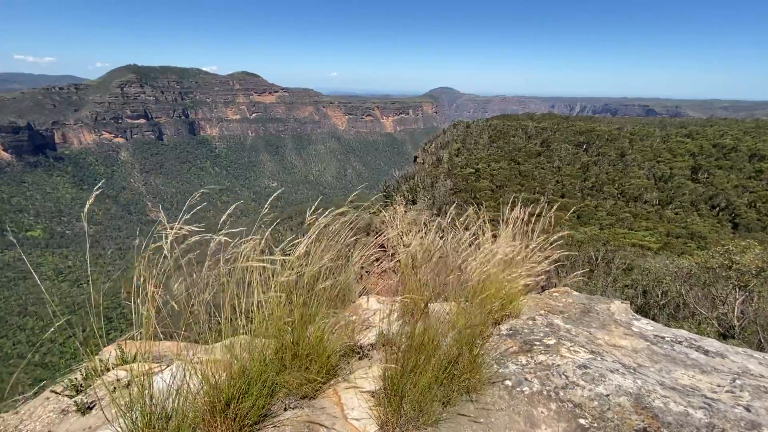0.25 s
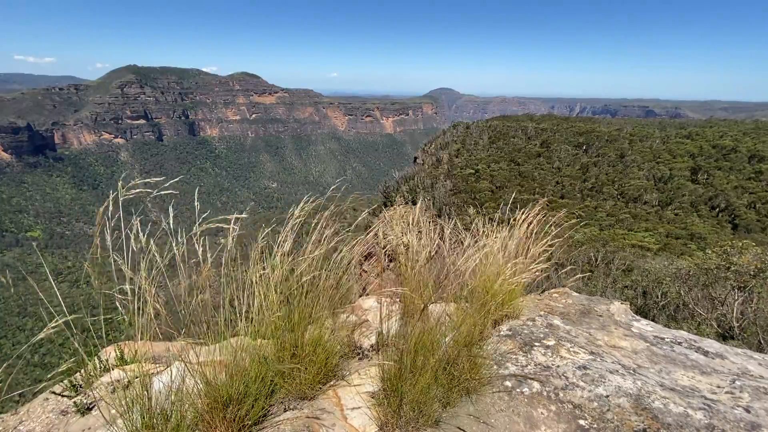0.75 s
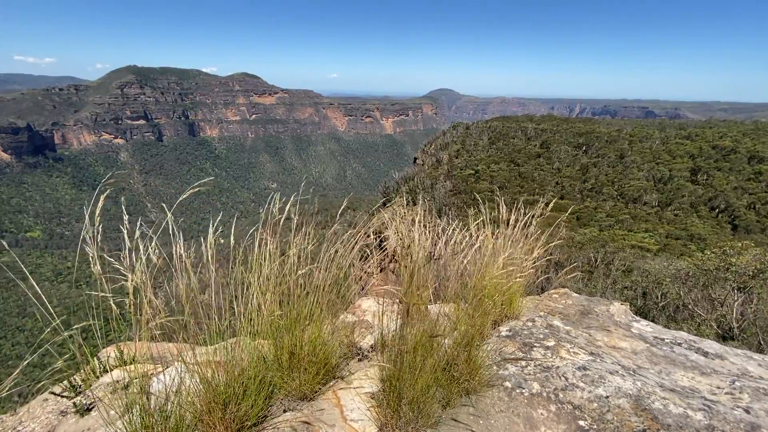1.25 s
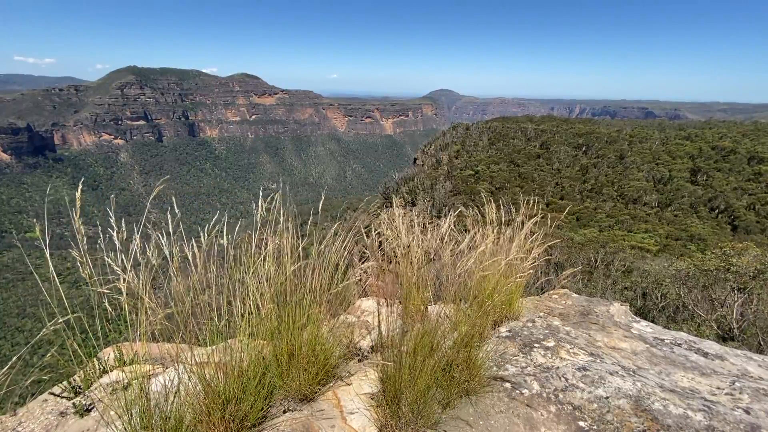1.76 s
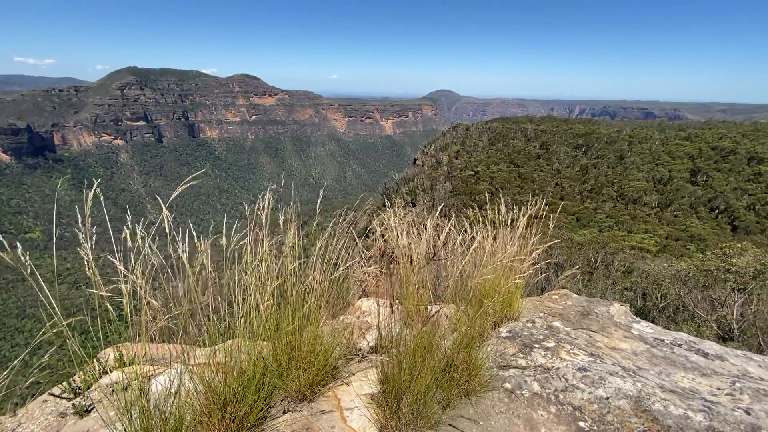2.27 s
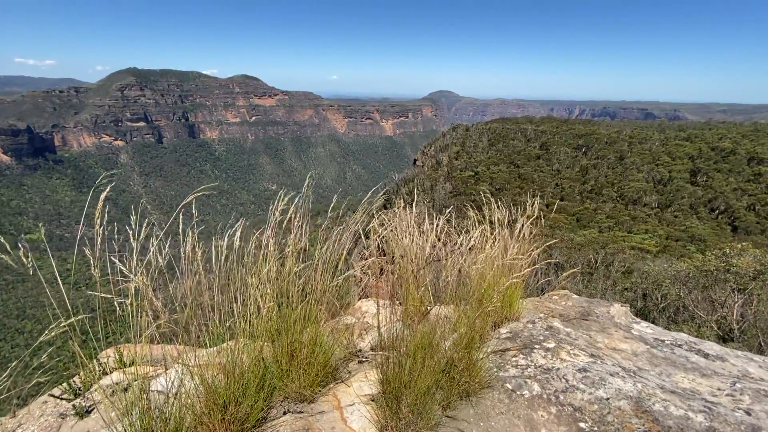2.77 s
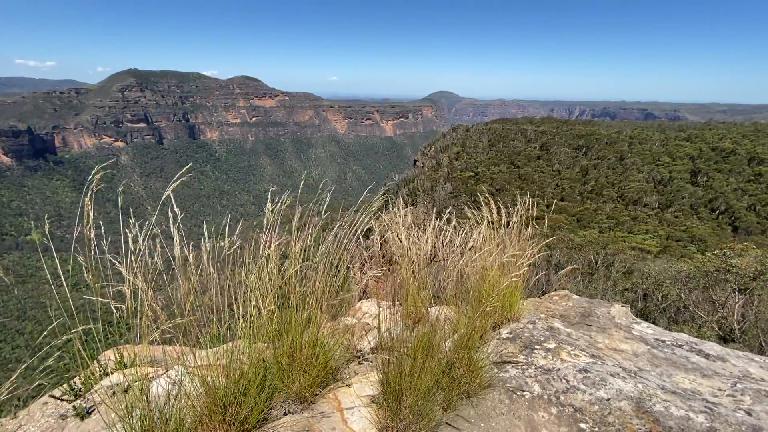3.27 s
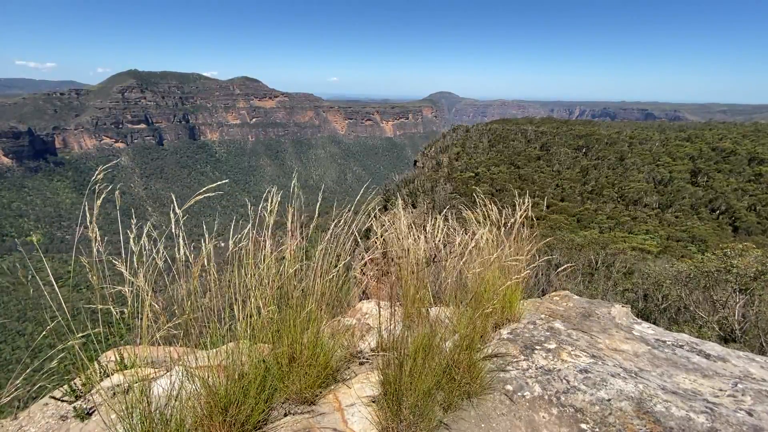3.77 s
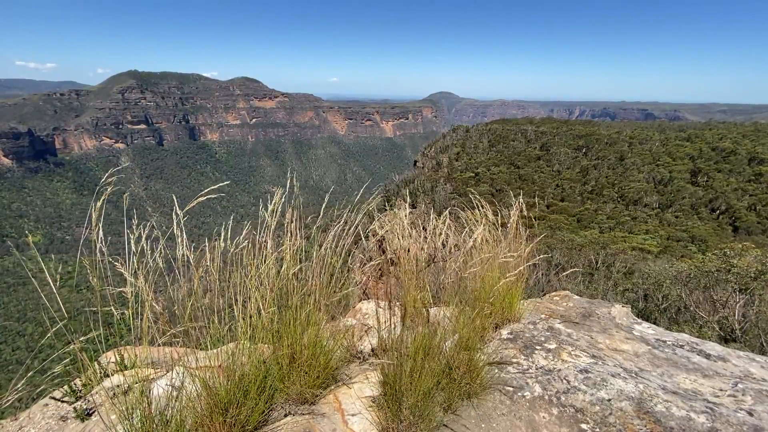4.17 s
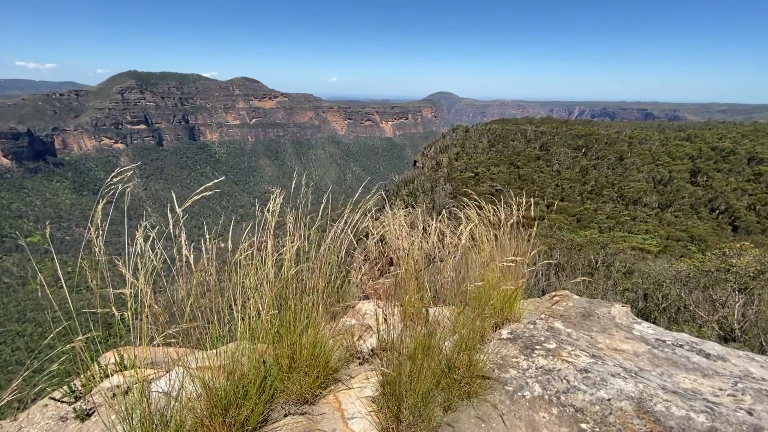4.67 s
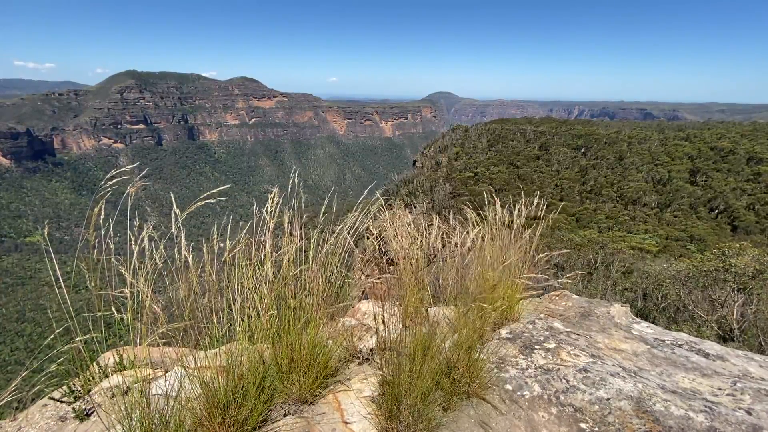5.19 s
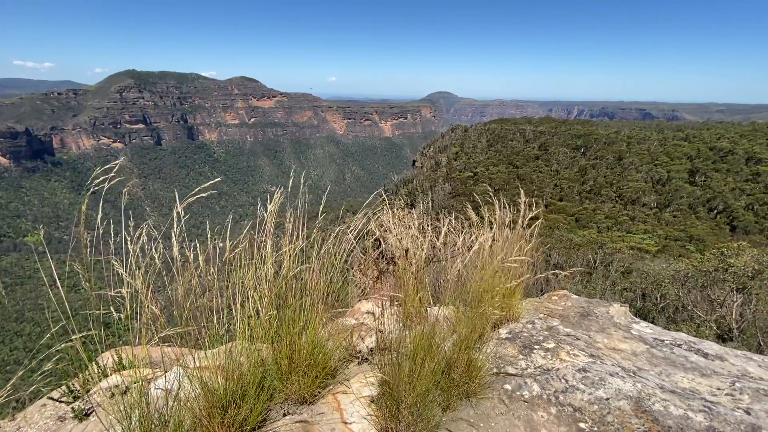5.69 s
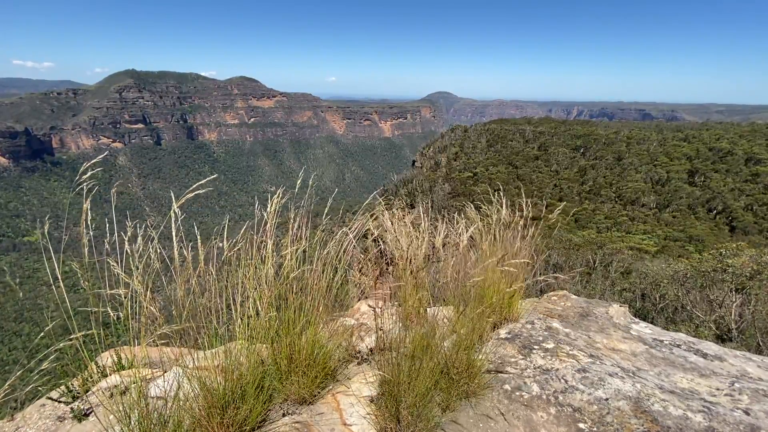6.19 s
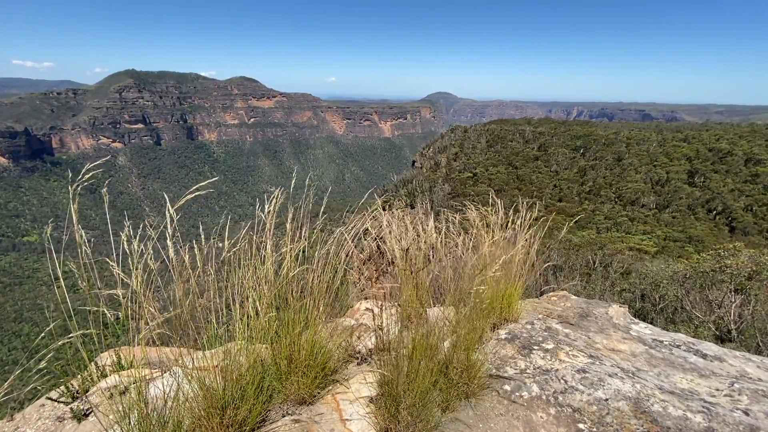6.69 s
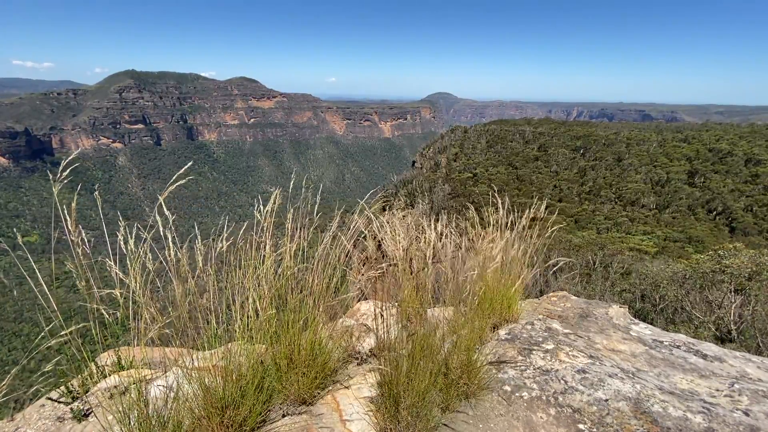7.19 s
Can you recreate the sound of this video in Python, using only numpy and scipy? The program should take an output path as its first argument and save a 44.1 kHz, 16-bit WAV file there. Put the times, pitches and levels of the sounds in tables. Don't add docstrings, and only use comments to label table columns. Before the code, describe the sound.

On an open clifftop, a large cicada close on the left buzzes short phrases about twice a second, later holding longer ones. A far chorus hisses steadily from the valley, and a tiny cicada ticks very high, five rasps a second. Wind pops and thuds on the hand-held microphone, strongest in the middle, then eases. A fly hums faintly past twice.

```python
import sys
import numpy as np
from scipy import signal
from scipy.fft import rfft, irfft, next_fast_len
from scipy.io import wavfile
from scipy.ndimage import uniform_filter1d

SR = 44100
rng = np.random.default_rng(int(sys.argv[2]) if len(sys.argv) > 2 else 0)


def invert_db(level):
    return 10 ** (np.asarray(level, dtype=float) / 20)


def bounce(signal):
    frames = np.transpose(np.atleast_2d(signal))
    limited = np.clip(frames, -1, 1)
    pcm = np.round(limited * 32767).astype(np.int16)
    wavfile.write(sys.argv[1], SR, pcm)


N = 328545
T = np.arange(N) / SR


def colour(x, points, lag_s=0.):
    hz, db = np.transpose(points)
    n = 2 * next_fast_len(N // 2 + 1)
    f = np.arange(n // 2 + 1) * SR / n + 1e-3
    gain = invert_db(np.interp(np.log(f), np.log(hz), db, -90, -90))
    delay = np.exp(-2j * np.pi * f * lag_s)
    y = irfft(rfft(x, n) * gain * delay, n)[:N]
    return y / np.std(y)


def walk(rate):
    hold = int(SR / rate)
    levels = np.repeat(rng.standard_normal(N // hold + 1), hold)
    return 1.5 * uniform_filter1d(uniform_filter1d(levels, hold), hold)[:N]


def hump(centre_s, length_s):
    return 2. ** -((2 * (T - centre_s) / length_s) ** 2)


def clicks(rate_hz, jitter_s, scatter_db, limp, start_s=0.):
    phase = np.cumsum(rate_hz) / SR
    clock = T[:len(phase)]
    turn = np.arange(0, int(phase[-1]))
    chance = rng.standard_normal((4000, 2))[:len(turn)].T
    when = np.interp(turn, phase, clock)
    early = np.interp(when, clock, limp / rate_hz) * (turn % 2)
    return start_s + when - early + jitter_s * chance[0], invert_db(scatter_db * chance[1])


def ring(when, size, modes):
    rib_s = 0.0028
    out = 0
    i = np.clip(when * SR, 0, N - 1).astype(int)
    t = T[:1500]
    for hz, width_hz, db in modes:
        drive = np.zeros(N, complex)
        np.add.at(drive, i, size * np.exp(-2j * np.pi * hz * (when - i / SR)))
        swell = np.sin(np.pi / 2 * np.minimum(t / rib_s, 1)) ** 2
        shape = swell * np.exp(-np.pi * width_hz * t)
        tone = shape / shape.max() * np.exp(2j * np.pi * hz * t)
        out = out + invert_db(db) * signal.fftconvolve(drive, tone)[:N].imag
    return out


def ports(x, lag_s):
    flat = [(1, 0), (SR, 0)]
    return np.std(x) * np.array([colour(x, flat, lag_s), x / np.std(x)])


def big_cicada():
    # [t/s, length/s, level change/dB, left minus right change/dB]
    swells = [
        (0.344, 0.17, 4, -1.5),
        (4.697, 0.3, 4, 2),
        (4.945, 0.22, -2, 3),
        (5.2, 0.184, -1.5, 3),
        (5.513, 0.062, 1.5, -2),
        (6.3, 0.084, -4.5, 3),
        (6.774, 0.3, 4.5, 2.5),
        (6.94, 0.27, -3.5, -0.5),
    ]
    # [t/s, length/s, level/dB, climb through the phrase/dB, left minus right/dB]
    phrases = [(0.0, 0.085, -41, 3, 9), (0.196, 0.34, -39.5, -0.5, 7), (0.811, 0.28, -43.5, 1.5, 8.5),
               (1.35, .27, -45, -0.5, 12.5), (1.862, 0.26, -44, 2.5, 12), (2.382, .249, -44, -4.5, 11.5),
               (2.88, .267, -44, 0, 12.5), (3.399, 0.29, -47.5, 1, 15), (3.941, .27, -44.5, 2.5, 12),
               (4.453, 1.502, -44, 2.5, 7.5), (6.09, 0.91, -46, -3, 9), (7.075, .375, -46, 1, 15.5)]
    # [f/Hz, width/Hz, level/dB]
    drum = [(4357, 141, -0.23), (3610, 57, -26.5), (5820, 230, -22)]
    # [f/Hz, width/Hz, level/dB]
    overtones = [(7170, 120, -44), (7960, 540, -45.5), (8250, 200, -45.5), (8960, 430, -36)]
    # [t/s, f/Hz]
    buckles = [(.3, 191), (1.0, 194), (4.3, 197), (4.65, 194), (5.2, 186), (6.2, 184), (7.45, 187)]
    entry_db, entry_s = -.5, .04
    warmup_s, limp = .05, .055
    sag, sag_s = .015, .08
    neighbour_db = -14.5
    when, size, pan_db, drift = [], [], np.full(N, 9.), walk(6)
    swell_db, lean_db = sum(hump(s, length) * np.array([[db], [side_db]]) for s, length, db, side_db in swells)
    for start, length, phrase_db, climb_db, side_db in phrases:
        on = (T >= start) & (T < start + length)
        pan_db[on] = side_db + lean_db[on]
        u = T[on] - start
        level_db = phrase_db + climb_db * (u / length - .5)
        level_db = level_db + entry_db * np.exp(-u / entry_s) + swell_db[on]
        cold = np.exp(-(u + (start < .01)) / warmup_s)
        tired = sag * np.exp((u - length) / sag_s)
        rate_hz = np.interp(T[on], *np.transpose(buckles)) * (1 - .17 * cold - tired + .004 * drift[on])
        # rate ratio, jitter in s, scatter in dB, level in dB
        for speed, jitter_s, scatter_db, db in [(1, .000015, 1.0, 0), (.965, .00003, 2.0, neighbour_db)]:
            at, gain = clicks(speed * rate_hz, jitter_s, scatter_db, limp + 0.329 * cold, start)
            second_drum = np.arange(len(at)) % 2
            shy_db = np.interp(at, T[on], cold) * (db + 1.5 - 4.5 * second_drum)
            when = np.r_[when, at]
            size = np.r_[size, gain * invert_db(db + shy_db + np.interp(at, T[on], level_db))]
    song = invert_db(8.0) * ring(when, size, drum)
    loose = when + 0.000338 * rng.standard_normal(len(when))
    upper = invert_db(-21) * ring(loose, size ** 0.3, overtones)
    tail = rng.standard_normal((2, 4000)) * invert_db(-60 * T[:4000] / 0.065)
    blur = signal.fftconvolve(song[None], tail, axes=1)[:, :N] * invert_db(-54.5)
    pan_db = uniform_filter1d(pan_db, size=800)
    direct = ports(song, 0.0002595) * invert_db(np.array([pan_db, -pan_db]) / 2)
    return direct + blur + ports(upper, 0.00025)


def chorus():
    # [t/s, level/dB]
    swelling = [(0.0, -44), (0.1, -54.5), (0.52, -51.5), (0.6, -53.5), (2.53, -52), (2.76, -56.5),
                (2.9, -53), (4.3, -53.5), (4.44, -56.5), (4.65, -50.5), (5.13, -57), (5.33, -48.5),
                (5.48, -52.5), (7.2, -52.5), (7.41, -51.5)]
    # [f/Hz, level per Hz/dB]
    chorus_colour = [(1710, -39), (2900, -25), (3270, -18), (3370, -14), (3760, -2.5), (4100, 0.5),
                     (4640, 2.5), (4860, -6), (6090, -23.5), (6180, -15.5), (6630, -29), (7700, -32.5),
                     (9600, -18.5), (12500, -101), (21100, -120)]
    # [f/Hz, level per Hz/dB]
    valley_colour = [(250, -18), (420, -14.5), (780, -15), (1010, -12), (1120, -14.5), (1290, -12),
                     (1410, -4), (1660, 1), (2070, -5.5), (2370, -4), (3100, -8.5), (4030, -16),
                     (6820, -120)]
    noise = rng.standard_normal((6, N))
    level_db = np.interp(T, *np.transpose(swelling)) + 3.5 + .7 * walk(12)
    high = [colour(n * invert_db(0.31 * walk(150)), chorus_colour) for n in noise[:3]]
    low = [colour(n * invert_db(1.4 * walk(8.2)), valley_colour) for n in noise[3:]]
    below = signal.butter(6, 6300, fs=SR, output="sos")
    above = signal.butter(6, 6300, "high", fs=SR, output="sos")
    unlike = signal.sosfilt(below, high[1:])
    treble = ports(signal.sosfilt(above, high[0]), 0.000256)
    far = 0.12 * ports(high[0], 0.0002558) + 0.76 * unlike + 0.28 * treble
    far = far * invert_db(level_db + 6.5)
    valley = 0.56 * ports(low[0], 0.00051) + 0.84 * np.array(low[1:])
    valley = valley * invert_db(-58.5 - 1.84 * np.exp(-T / 2.0))
    lean = invert_db(np.array([[1.5], [-1.5]]))
    return lean * (far + valley)


def small_cicada():
    # [t/s, level/dB, late against the beat/s]
    rasps = [(0, -71, 0.0044), (.7, -63.5, -0.003), (1.3, -64, -0.012), (2.1, -67, 0.0022),
             (2.6, -63.5, -0.0023), (3.5, -66, -0.0075), (3.8, -67.5, -0.015), (4.5, -62, -0.012),
             (4.9, -65.5, -0.02), (5.5, -63.5, -0.0099), (6.0, -66.5, -.021), (6.5, -67, -0.019),
             (7.1, -68.5, -0.0081), (7.4, -64, -0.0054)]
    # [f/Hz, level/dB]
    rasp_colour = [(9200, -41), (10000, -14), (11400, -7), (13200, -3.5), (15000, -1), (15500, -3),
                   (16500, -20)]
    # [f/Hz, level/dB]
    kin_colour = [(9200, -26), (10000, -6.5), (11400, -1.5), (13200, 0.5), (15000, -3), (16500, -1)]
    beat_s, first_stop_s, rasp_s, scatter_db = .1953, .148, .083, 1.2
    gate = np.zeros(N)
    s, level_db, late_s = np.transpose(rasps)
    beats = first_stop_s + beat_s * np.arange(int(T[-1] / beat_s))
    for beat, luck in zip(beats, rng.standard_normal(len(beats))):
        u = T - beat - np.interp(beat, s, late_s) + rasp_s
        db = np.interp(beat, s, level_db) + scatter_db * luck
        rise = np.clip((u + 0.014) / 0.044, 0, 1) ** 0.9
        stop = np.exp(-np.maximum(u - rasp_s, 0) / 0.0066)
        gate += invert_db(db + 3.5) * rise * stop
    when, size = clicks(525 * (1 + 0.016 * walk(20)), .0003, 1.9, .1)
    size = size * invert_db(1.5 * np.sin(2 * np.pi * 105 * when))
    ticks = np.bincount(np.clip(when * SR, 0, N - 1).astype(int), size, N)
    burst = signal.lfilter([1], [1, -np.exp(-1 / (0.0057 * SR))], ticks) * rng.standard_normal(N)
    rasp = colour(burst * gate, rasp_colour) * np.sqrt(np.mean(gate ** 2))
    kin = colour(rng.standard_normal(N) * invert_db(0.46 * walk(5)), kin_colour)
    return ports(rasp + invert_db(-71) * kin, 0.0002656)


def eddy(top_hz, turn, last_s, fall_s, end_hz, size=3000):
    t = T[:size]
    hz = end_hz + (top_hz - end_hz) * np.exp(-t / fall_s)
    shape = (t / last_s) ** 2 * np.exp(-2 * t / last_s)
    return np.sin(np.cumsum(hz) * 2 * np.pi / SR + turn) * shape / shape.max()


def turbulence(top_hz, scatter_db, count):
    out = np.zeros(N + 3000)
    for when, turn, size, pitch in rng.random((count, 4)):
        i = int(when * N)
        swirl = eddy(top_hz * (.5 + pitch), 2 * np.pi * turn, 0.0034, 0.006, 91, size=1000)
        out[i:i + 1000] += invert_db(-scatter_db * np.log(1 - size)) * swirl
    return out[:N] / np.std(out)


def wind():
    # [t/s, length/s, rumble level/dB, flutter minus rumble/dB, left minus right/dB]
    gusts = [(.27, 0.2, -55.5, 0, 6.5), (0.92, 0.028, -45.5, -34, 17), (1.276, 0.096, -70, -11, 17),
             (1.547, 0.16, -45, -32, 6), (1.807, 0.28, -46, -4.5, 2.5), (2.107, 0.1, -40, -38, 7.5),
             (2.272, 0.25, -44.5, -20, 7), (2.636, 0.16, -43.5, -39, 2), (2.878, 0.11, -43.5, -10, 3),
             (3.126, 0.28, -52.5, -2.5, -0.5), (3.405, 0.22, -38.5, -16.5, 5.5),
             (3.633, 0.083, -42, -1.5, -1), (3.768, 0.16, -35.5, -7, 4.5), (3.987, 0.12, -44.5, -32, 3.5),
             (4.319, 0.2, -34.5, -9.5, 2.5), (4.612, 0.18, -47.5, -5, 4), (4.794, 0.2, -54.5, -0.5, 2),
             (5.01, 0.11, -64, -4, 10), (5.243, 0.082, -45.5, -15, -4), (5.58, 0.13, -56, -11, 2),
             (5.905, 0.16, -49.5, -11.5, 4.5), (6.24, 0.44, -56, -1, 1), (6.671, 0.23, -42, -14, 1.5),
             (7.29, 0.21, -52, -15, 7)]
    # [t/s, peak level/dB, sharpness/dB, left minus right/dB]
    pops = [(0.266, -36, -23, -1), (0.276, -42.5, -14.5, 6), (1.749, -38, -12, 5.5),
            (1.769, -39, -11.5, 3.5), (1.792, -35.5, 1.5, 6.5), (1.817, -37.5, 1.5, 7.5),
            (1.838, -32, -15, 0.5), (1.852, -38, 1, 6.5), (2.074, -39.5, -14.5, 12), (2.196, -48, -28, 23),
            (3.289, -47.5, -24.5, 20.5), (3.64, -40.5, -16, 8), (3.658, -38.5, -17, -4),
            (3.689, -44, -2.5, 6.5), (3.733, -32, -21, -2.5), (3.809, -32, -12, 6), (3.842, -44.5, -7, 8),
            (4.191, -43, -2.5, 5), (4.22, -33, -27, -2.5), (4.348, -40.5, -16.5, 5.5), (4.414, -41, -13, 4),
            (4.493, -36, -12.5, 2.5), (4.552, -38, -23, 2), (4.606, -34, -15.5, -3),
            (4.633, -44, -9.5, 5.5), (4.676, -55, -16.5, 3), (4.767, -41.5, -6.5, 4), (4.836, -44, -6.5, 5),
            (4.847, -34.5, -12, 3.5), (6.658, -49, -19.5, 16.5)]
    # [t/s, peak level/dB, left minus right/dB]
    thuds = [(0.857, -43.5, 18.5), (1.445, -57, 5), (2.063, -43, 11.5), (2.408, -38, 12), (3.158, -55, -11),
             (3.285, -40.5, -9.5), (3.624, -39, 15), (3.835, -32.5, 12), (4.198, -35.5, 9.5),
             (4.989, -52, -10.5), (5.214, -59, 5), (5.528, -52, 0), (5.984, -47, 17), (6.122, -46.5, 10.5),
             (6.466, -50.5, 15), (6.624, -48, 16), (7.272, -59, -16)]
    # [f/Hz, level/dB]
    rumble_colour = [(15, -14), (30, 0), (55, 4.5), (85, -1.5), (130, -9.5), (220, -22), (400, -47.5)]
    # [f/Hz, level/dB]
    scrub_colour = [(60, -20), (120, -2), (200, 0.5), (310, -2.5), (430, -14.5), (600, -31)]
    lull_db, lull_flutter_db = -68.5, -16
    scrub_db, scrub_follow, scrub_lag_s = -50, 0.28, 0.55

    def spread(shared, left, right):
        return np.array([shared + 0.74 * left, -shared + 0.78 * right])

    heave = np.full((2, N), invert_db(lull_db))
    flutter = np.full((2, N), invert_db(lull_db + lull_flutter_db))
    for centre, length, db, flutter_db, side_db in gusts:
        gust = hump(centre, length) * invert_db(db + np.array([[side_db], [-side_db]]) / 2)
        heave, flutter = heave + gust, flutter + gust * invert_db(flutter_db)
    rumble = [colour(rng.standard_normal(N) * invert_db(3.2 * walk(22)), rumble_colour) for _ in range(3)]
    swirl = [invert_db(-6.0) * turbulence(399, 2.8, count=1400) for _ in range(3)]
    out = np.zeros((2, N + 3000))
    out[:, :N] = spread(*rumble) * heave + spread(*swirl) * flutter
    for (when, db, sharp_db, side_db), turn in zip(pops, rng.random((len(pops), 3))):
        i = int((when - .005) * SR)
        top_hz = 1150 * invert_db(0.416 * sharp_db)
        pop = np.roll(eddy(top_hz, 2 * np.pi * turn[0], .0045, .004, 90), 60)
        pop += .5 * eddy(top_hz * (.4 + .4 * turn[1]), 2 * np.pi * turn[2], .003, .004, 150)
        pop = signal.sosfilt(signal.butter(4, 1.27 * top_hz, fs=SR, output="sos"), pop)
        sides = np.array([[invert_db(0.65 * side_db)], [-invert_db(-.6 * side_db)]])
        out[:, i:i + 3000] += invert_db(db + 3.0) * pop * sides
    for (when, db, side_db), turn in zip(thuds, rng.random(len(thuds))):
        i = max(int((when - .005) * SR), 0)
        thud = eddy(166, 2 * np.pi * turn, 0.019, 0.012, 52.7)
        sides = np.array([[invert_db(0.4 * side_db)], [-invert_db(-.6 * side_db)]])
        out[:, i:i + 3000] += invert_db(db + 3.0) * thud * sides
    scrub = np.array([colour(rng.standard_normal(N) * invert_db(2.3 * walk(2.7)), scrub_colour) for _ in range(2)])
    mean_wind = uniform_filter1d(heave.mean(0), int(scrub_lag_s * SR))
    return out[:, :N] + scrub * invert_db(scrub_db) * mean_wind ** scrub_follow


def fly():
    # [t/s, wing beat f/Hz, level/dB]
    visits = [
        [(2.07, 215.5, -90), (2.13, 239, -72), (2.22, 263, -65), (2.27, 300, -80)],
        [(6.27, 287.6, -82), (6.32, 290, -65.5), (6.4, 275.4, -61), (6.47, 295, -67), (6.54, 285, -75),
         (6.62, 295, -72), (6.67, 303, -86)],
    ]
    wing_db = [6, 1, 3, -2, -2, -8]
    out = 0
    wobble = 1 + 0.0067 * walk(30)
    for visit in visits:
        s, hz, db = np.transpose(visit)
        phase = 2 * np.pi * np.cumsum(np.interp(T, s, hz) * wobble) / SR
        buzz = sum(invert_db(h) * np.sin((k + 1) * phase) for k, h in enumerate(wing_db))
        out = out + buzz * invert_db(np.interp(T, s, db, -140, -140))
    return out * np.array([[1.3], [-.7]])


def scene():
    return big_cicada() + chorus() + small_cicada() + wind() + fly()


def low_pass(x):
    return signal.sosfilt(signal.butter(12, 16880, fs=SR, output="sos"), x)


def record(dry):
    low_cut = signal.butter(2, 50, "high", fs=SR, output="sos")
    top_cut = signal.ellip(10, .2, 70, 15740, fs=SR, output="sos")
    mix = signal.sosfilt(np.r_[low_cut, top_cut], dry)
    return low_pass(mix)


dry = scene()
out = record(dry)
bounce(out)
```